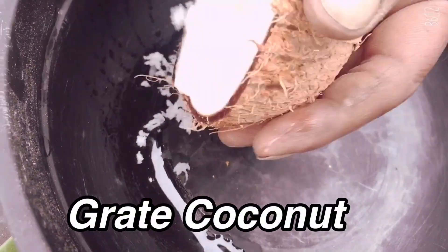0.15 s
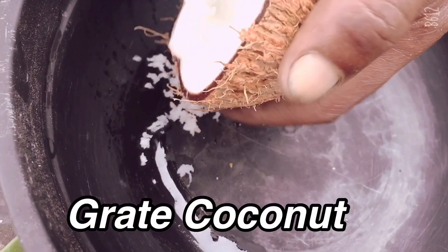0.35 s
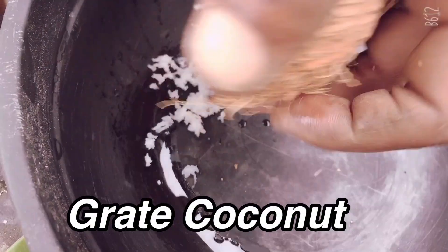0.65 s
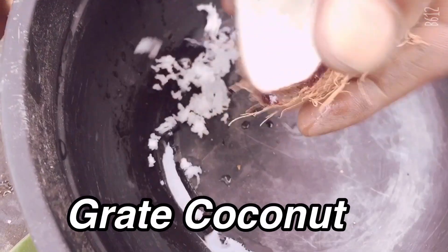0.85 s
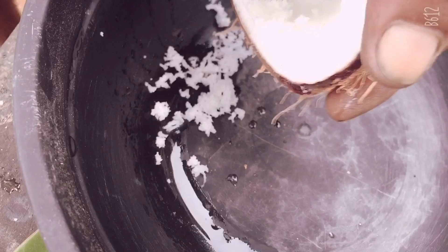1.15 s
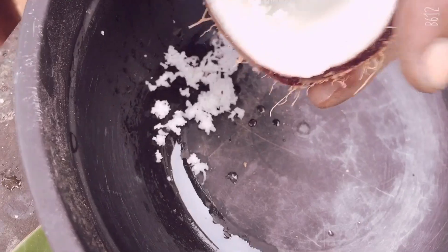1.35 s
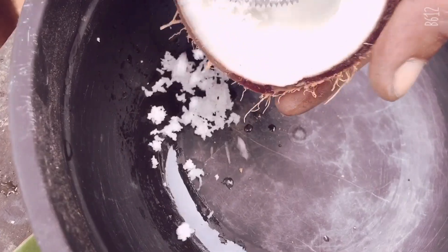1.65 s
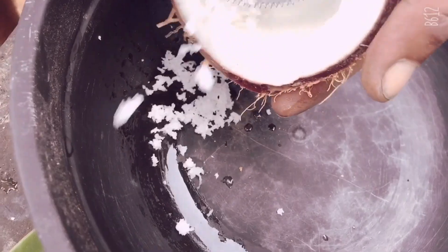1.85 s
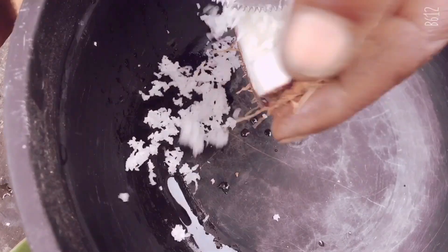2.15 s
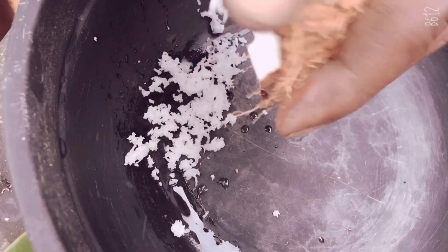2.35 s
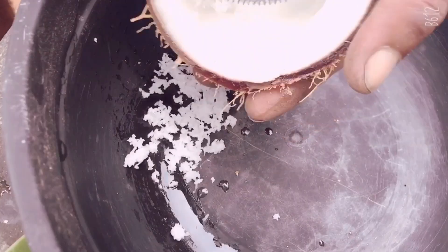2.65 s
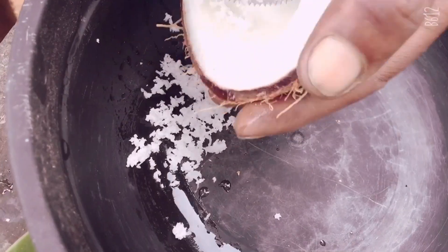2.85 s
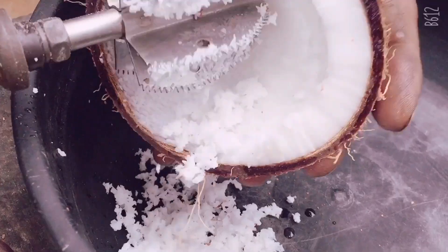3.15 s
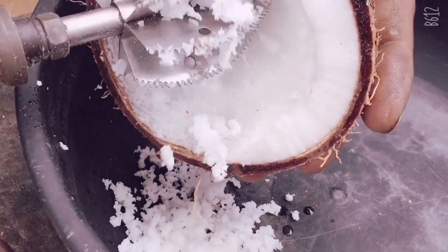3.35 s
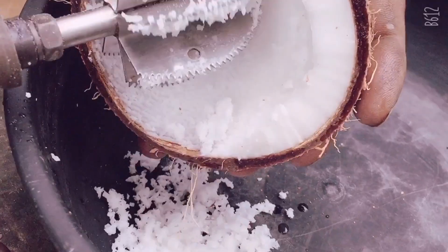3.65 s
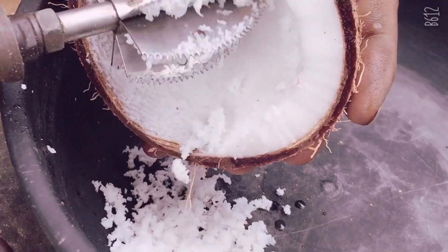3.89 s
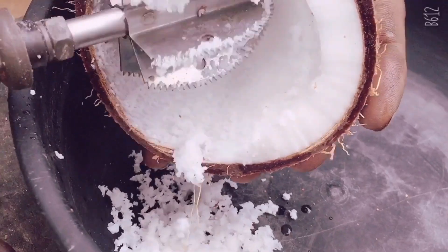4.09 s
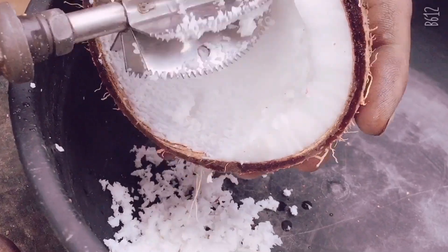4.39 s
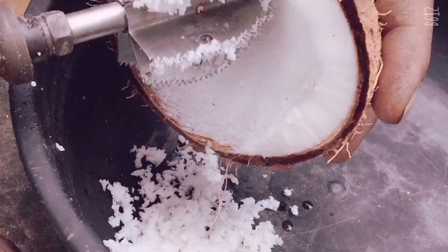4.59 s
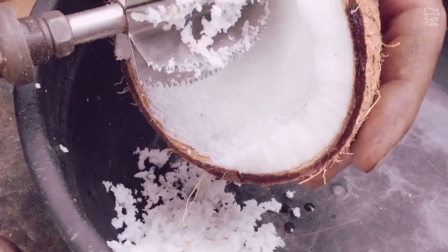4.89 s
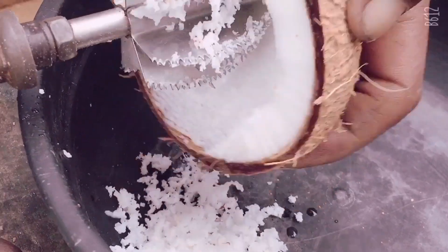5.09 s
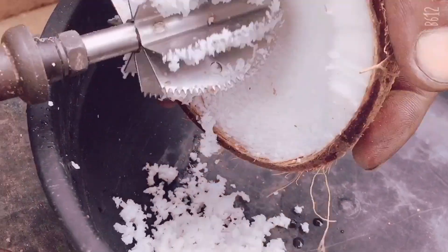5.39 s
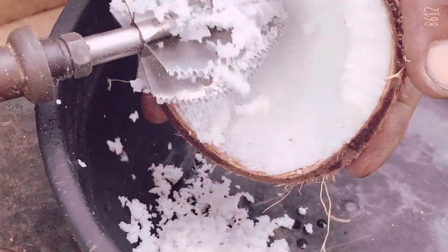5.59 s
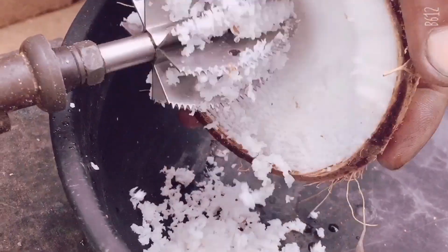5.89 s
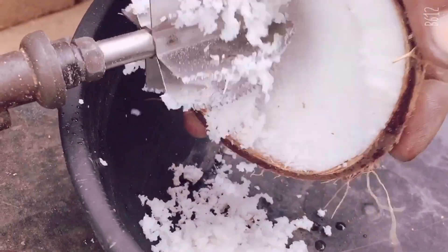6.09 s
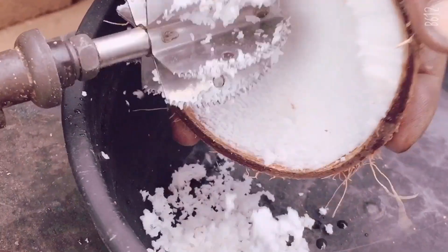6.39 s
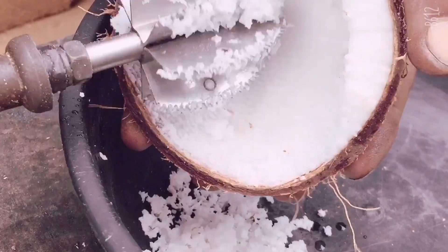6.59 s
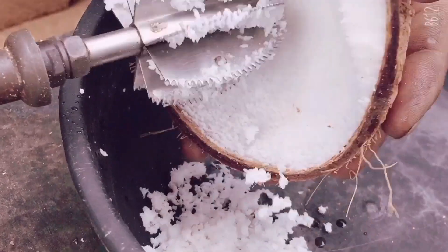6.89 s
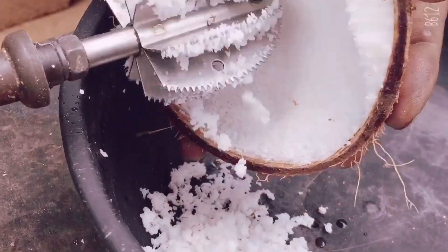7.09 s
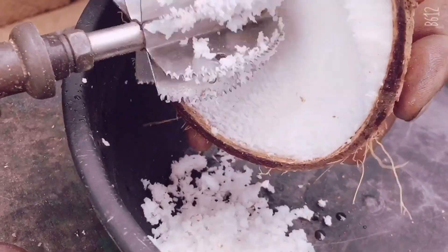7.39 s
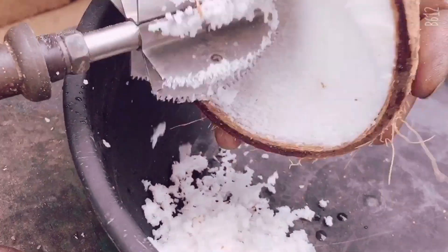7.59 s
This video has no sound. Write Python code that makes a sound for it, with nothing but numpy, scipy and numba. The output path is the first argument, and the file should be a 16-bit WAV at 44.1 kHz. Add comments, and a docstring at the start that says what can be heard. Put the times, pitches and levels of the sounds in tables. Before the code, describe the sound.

Coarse, dense rasping of coconut flesh on a toothed metal grater, with loose shaft knocks, a low stand rumble and two brief pauses.

```python
"""Half a coconut is pressed on a hand-cranked grater head of six toothed steel blades, over a stone bowl.
Dense random tooth ticks ring the shell and tear out hiss; quick jolts of level and slipping blades shape both.
Behind them the loose shaft knocks in bursts of ringing and crunch, the stand rumbles, and faint low pulses,
faint whistles and still yard air lie beneath. One dry mono microphone, no echo; the sound drops out once.
In the dropout and in the last pause the nut is held anew, which shifts the resonances of the shell."""
import sys
import numpy as np
from scipy import signal
from scipy.fft import rfft, irfft
from scipy.io import wavfile
from scipy.ndimage import uniform_filter1d
from numba import njit

SR = 44100
rng = np.random.default_rng(int(sys.argv[2]) if len(sys.argv) > 2 else 0)


def persist_wave(psi):
    """Save psi, clipped to +-1, as 16-bit WAV."""
    counts = np.round(np.clip(psi, -1, 1) * 32767).astype(np.int16)
    wavfile.write(sys.argv[1], SR, np.atleast_2d(counts).T)


N = 341334


def undb(db):
    """Amplitude factor of a level in dB."""
    return 10 ** (np.asarray(db) / 20)


def unit(x):
    """Scale to an rms of 1."""
    return x / np.sqrt(np.mean(x ** 2))


def filtered(sos, x):
    """Run x once through second-order sections."""
    return signal.sosfilt(sos, x)


@njit
def resonance(x, hz, width):
    """State-variable band-pass with a moving centre, gain 1 there."""
    y, band, low = np.empty(len(x)), 0., 0.
    for i in range(len(x)):
        g, damping = np.pi * hz[i] / SR, width[i] / hz[i]
        g += g ** 3 / 3  # approximates tan(g)
        v = (band + g * (x[i] - low)) / (1 + g * (g + damping))
        band, low, y[i] = 2 * v - band, low + 2 * g * v, damping * v
    return y


def coloured(x, points):
    """Shape the spectrum of x by (frequency [Hz], level [dB]) points joined on a log-frequency axis."""
    hz, db = np.transpose(points)
    f = np.arange(N // 2 + 1) * SR / N + 1
    gain = undb(np.interp(np.log(f), np.log(hz), db, left=-120, right=-120))
    return unit(irfft(rfft(x) * gain, N))


def walk(rate):
    """Random levels held 1 / rate s and smoothed twice; spread near 1."""
    k = int(SR / rate)
    steps = np.repeat(rng.standard_normal(N // k + 1), k)[:N]
    return 1.105 * uniform_filter1d(uniform_filter1d(steps, k), k)


def ticks(rate, spread_db):
    """Random tooth ticks of either sign, on average rate per second, a few stronger than the rest."""
    chance, size = rng.random(N), np.minimum(rng.exponential(1, N), 4)
    sign = np.where(chance < rate / SR / 2, 1, -1)
    return unit((chance < rate / SR) * sign * undb(spread_db * size))


def swells(rows, steep):
    """Brief rises or dips in dB from (time, height, length) rows; steep flattens their tops."""
    out, t = np.zeros(N + 8192), np.arange(-4096, 4096) / SR
    for s, db, length in rows:
        i = int(s * SR)
        out[i:i + 8192] += db * np.exp(-np.abs(t / (length / 2)) ** steep)
    return out[4096:N + 4096]


# moments when the nut is held anew: time [s]
REGRIPS = (3.08, 5.0)


def hold_number():
    """Which hold of the nut each sample falls in, counted from 0."""
    return np.searchsorted(REGRIPS, np.arange(N) / SR)


def body(holds, rate, spread_db, flicker_db, sway_db, snaps, own, wander, tilt_db=0):
    """Ticks ring each resonance, part shared and part its own; centres wander and jump with the hold."""
    hold = np.minimum(hold_number(), len(holds) - 1)
    shared, other, out = ticks(rate, spread_db), ticks(rate, spread_db), 0
    shared = shared + snaps * ticks(rate / 20, spread_db)  # tougher fibres snap now and then
    for modes in zip(*holds):  # the same resonance in every hold
        hz, width, db = (column[hold] for column in np.array(modes, float).T)
        level_db = db + tilt_db * np.log2(hz / 2800)
        level_db = level_db + flicker_db * walk(45) + sway_db * walk(6)
        own_ticks = own * np.roll(other, rng.integers(N))
        push = (shared + own_ticks) * undb(level_db)
        out = out + resonance(push, hz * (1 + wander * walk(13)), width)  # the nut rocks
    rms = np.sqrt([np.mean(out[hold == k] ** 2) for k in range(len(holds))])
    return out / rms[hold]


# cutting effort before and after the dropout:
# (time [s], hiss level [dB], rasp over hiss [dB], rumble level of the stand [dB])
CUTTING = [
    [(0.0, -38, 18, -29), (0.03, -36.5, 17, -28.5), (0.23, -46.5, 16.5, -38.5), (0.26, -69, 16, -56),
     (0.49, -55.5, 1, -60), (0.53, -55.5, 20.5, -37), (0.76, -38.5, 17.5, -32), (1.26, -36.5, 19, -35),
     (2.0, -39.5, 21.5, -32), (2.16, -38.5, 16, -34), (2.6, -37.5, 19, -31), (3.02, -44.5, 20, -40),
     (3.06, -47.5, 22.5, -42)],
    [(3.1, -38, 14.5, -33.5), (3.38, -39.5, 15.5, -30.5), (3.95, -39, 15.5, -32), (4.45, -39, 15, -33),
     (4.64, -36.5, 14.5, -33.5), (4.78, -41.5, 14.5, -29.5), (4.87, -68, 13, -55), (5.09, -79, 16, -56.5),
     (5.15, -47.5, 15.5, -34.5), (5.45, -37.5, 13, -32.5), (6.1, -39.5, 13.5, -27.5),
     (6.52, -37.5, 13, -30.5), (7.22, -35.5, 12, -30.5), (7.42, -39, 11.5, -34.5), (7.74, -34.5, 9.5, -25)],
]


def effort():
    """Pressing harder or easing off moves hiss, rasp and rumble, in dB, along straight lines."""
    s, *columns = np.transpose(np.concatenate(CUTTING))
    return [np.interp(np.arange(N) / SR, s, column) for column in columns]


# resonances of shell and blades under the teeth, first, second and third hold:
# (centre before wander [Hz], width [Hz], relative level [dB])
SHELL_MODES = ([(1110, 74, -24), (850, 110, -31), (1712, 53, -8), (2308, 140, 0), (2710, 110, -0.5),
               (2965, 150, 4), (3380, 140, 1.5), (3653, 117, 5), (4200, 200, -8.5)], [(1060, 74, -16),
               (1266, 13, -9.5), (1820, 210, -14.5), (2074, 44, -4), (2643, 194, 0.5), (3030, 220, -2),
               (3386, 124, -5.5), (3645, 88, -3), (4420, 94, -12.5)], [(1076, 70, -12), (1278, 30, -8),
               (1840, 150, -20), (2105, 110, -4.5), (2627, 184, -0.5), (2980, 210, -1.5), (3425, 113, -1.5),
               (3733, 115, 0.5), (4360, 180, -2.5)])
# brightness of the rasp about 2800 Hz: (time [s], tilt [dB per octave])
RASP_TILT = [(.3, 4), (0.56, -6), (0.66, 1), (.89, -2), (.96, 1), (2.45, -1), (2.8, 10.5), (3.1, -2)]


def rasp():
    """The main voice: teeth tick through the flesh and ring shell and blades."""
    tilt_db = np.interp(np.arange(N) / SR, *np.transpose(RASP_TILT))
    ringing = body(SHELL_MODES, rate=1100., spread_db=2.1, flicker_db=2.8, sway_db=.9,
                   snaps=.45, own=1.6, wander=0.024, tilt_db=tilt_db)
    # the thick flesh swallows the top
    return filtered(signal.cheby2(8, 30, 4950., fs=SR, output="sos"), ringing)


# spectrum of wet flesh tearing: (frequency [Hz], relative level per Hz [dB])
TEARING = [(2820, 6), (4800, -2.5), (5250, 1.5), (6330, 5), (7370, 1.5), (8140, 5), (9810, 4),
           (15600, -12.5)]
# steady level of the upper half of the hiss, one per hold: level [dB]
UPPER_HISS = (-1.5, -1, 0.5)


def hiss():
    """Fine tearing from very dense ticks, its lower and upper halves flickering apart."""
    tear = coloured(ticks(12000., 2.6), TEARING)
    lower = signal.sosfiltfilt(signal.butter(2, 9500., fs=SR, output="sos"), tear)
    upper_db = np.array(UPPER_HISS)[hold_number()] + 2.6 * walk(35)
    return lower * undb(1.4 * walk(35)) + (tear - lower) * undb(upper_db)


# quick level changes of the rasp, mostly sharp rises, a few dips:
# (time [s], change before shaping [dB], length [s])
QUICK_CHANGES = [(.1, 8, 0.018), (0.56, 12, 0.012), (0.707, 5.5, .015), (0.857, 5.5, .012), (0.87, 2, .012),
                 (.895, 4, 0.017), (0.944, 1.5, 0.016), (1.04, 4.5, 0.0079), (1.119, 7, .01),
                 (1.154, 3, 0.019), (1.203, -3, .015), (1.22, 3, .015), (1.247, 5, .015),
                 (1.4492, -4, 0.013), (1.642, 2, 0.011), (1.736, 6, 0.012), (1.785, 4, 0.016),
                 (1.8163, 3, 0.0051), (2.4609, -6, 0.0065), (2.573, 4.5, 0.03), (2.704, 7, 0.012),
                 (2.733, 4, .045), (2.812, 5, 0.035), (2.861, 4, .04), (3, 5, 0.018), (3.046, 5, .01),
                 (3.137, 4.5, 0.038), (3.276, 10, .012), (3.4, 2, 0.0087), (3.417, 1, 0.0084),
                 (3.484, 4, 0.007), (3.653, 5.5, 0.013), (3.7533, 5, 0.025), (3.865, 3, 0.016),
                 (4.199, 3.5, .02), (4.298, 2.5, .02), (4.3416, 5, .006), (4.448, 4.5, .025),
                 (4.567, 5.5, 0.03), (4.646, 4, .01), (4.68, 3.5, .03), (5.29, 4, 0.026), (5.505, 7, .015),
                 (5.445, 4, 0.025), (6.263, 5.5, .03), (6.626, 3, 0.011), (6.664, 4.5, .012),
                 (6.81, 3.5, 0.018), (7.54, 5, 0.046), (7.65, 3, 0.015), (7.731, 5, .015)]


def quick_changes():
    """Each change moves the level at once, then lets it return, in dB."""
    out, t = np.zeros(N + 4096), np.arange(4096) / SR
    for s, db, length in QUICK_CHANGES:
        i = int(s * SR)
        out[i:i + 4096] += db * (1 - np.exp(-t / 0.0016)) * np.exp(-(t / length) ** 2)
    return out[:N]


# a blade slips out of the flesh: (time [s], level change [dB], length [s])
BLADE_SLIPS = [(0.59, -8, 0.015), (0.697, -9, 0.033), (0.827, -7.5, 0.013), (0.937, -5, 0.019),
               (1.14, -2.5, 0.012), (1.414, -6.5, 0.031), (1.99, -7, 0.011), (2.053, -19, 0.015),
               (2.171, -6.5, 0.017), (2.234, -4, 0.019), (2.293, -8, 0.027), (2.532, -3, 0.034),
               (2.66, -2.5, 0.016), (2.695, -4, .01), (2.789, -4, 0.015), (2.91, -5.5, 0.019),
               (3.036, -4, 0.011), (3.129, -10, 0.028), (3.361, -9, 0.018), (3.493, -6.5, 0.046),
               (3.598, -11.5, 0.091), (3.7, -9.5, 0.039), (3.744, -6, 0.041), (4.272, -4.5, 0.044),
               (4.403, -3, 0.045), (5.182, -6.5, 0.063), (5.622, -8, 0.02), (5.668, -11.5, 0.018),
               (5.738, -7, 0.023), (5.807, -15.5, 0.031), (5.878, -2.5, 0.075), (6.164, -8, 0.035),
               (6.226, -14, 0.036), (6.297, -7.5, 0.039), (6.38, -6.5, 0.03), (6.498, -4, 0.017),
               (6.646, -7.5, 0.0092), (6.716, -6, 0.021), (6.776, -14, 0.031), (6.852, -4, 0.023),
               (6.916, -12.5, 0.039), (7.022, -6.5, 0.05), (7.074, -12, 0.015), (7.196, -5.5, 0.027),
               (7.258, -8, 0.019), (7.323, -13.5, 0.025), (7.456, -8, 0.024), (7.64, -4, 0.012)]


def grip():
    """Hold of the blades in dB: it chatters, changes quickly at times and falls away in each slip."""
    chatter = 0.45 * walk(25) + 1.74 * walk(80) + 1.4 * walk(200)
    return chatter + quick_changes() + swells(BLADE_SLIPS, 2.8)


# knocks of the shaft: (time [s], blow level before filtering [dB],
# low-mode boost [dB], high-mode boost [dB])
SHAFT_KNOCKS = [(.065, -6, -11, 0), (0.33, -34.5, -22, 17), (0.446, -30, -8, -8), (.512, -26, -4, 0),
                (0.522, -22.5, -4, 7), (.54, -12, -31, -12), (.577, -14.5, -17, -9), (.597, -18.5, -9, -17),
                (0.725, -10, -23, 3), (0.78, -10.5, -5.5, 2), (0.802, -15, -14, 1), (.873, -16, -1, -5),
                (.905, -21, -7, -5), (0.841, -4.5, -19, -8), (1.365, -7.5, -14, -1), (1.425, -10, -5, -15),
                (1.81, -8.5, -13, -8), (1.8297, -6, -27, 6), (2.073, -10.5, -18, -6),
                (2.122, -9.5, -17, -21), (2.32, -15.5, -15, -4), (2.626, -7.5, -8, 1),
                (2.68, -4.5, -11, 1.5), (2.741, -9, -6, 14), (3.222, -12.5, -10, -8),
                (3.2476, -4.5, -10.5, -2.5), (3.303, -18, -6, -14), (3.334, -12, -2, -15),
                (3.4813, -14.5, -26.5, 7), (3.966, -9.5, -25, 14.5), (4.039, -16, -2, -16),
                (4.913, -44, -10, 9), (4.988, -44, -8, -2), (5.1204, -21, -7, -21), (5.132, -10.5, -7, -15),
                (5.189, -24, 4, -18), (5.202, -7.5, -8, -24), (5.398, -6, -12, 0), (5.419, -7.5, -6, 5),
                (5.433, -7, -6, 0), (5.563, -15, -5, 3), (5.6475, 1, -14, -23), (5.7182, -11.5, -13, -19),
                (5.775, -13, -4, -1), (5.789, -14, -16, -14), (5.813, -19, -12, -9), (5.832, -10, -15, -3),
                (5.9301, -5.5, -5, -2.5), (6.073, -5, -10, -13), (6.114, -9, -3.5, 5),
                (6.139, -14.5, 6, -9), (6.208, -16.5, 2, -10), (6.358, -2, -11.5, -3),
                (6.485, -11.5, -4, -3), (6.525, -15, 0, 5), (6.63, -12, -22, -4), (6.653, -15, -15, 2),
                (6.751, -15, -28, 12), (6.88, -13.5, -4, -1), (6.89, -9.5, -17, -6), (6.923, -19, -7, -4),
                (6.971, -13.5, -2, 14), (7.089, -18, -2, 4), (7.175, 1, -9, 0), (7.241, -11, -12, -5),
                (7.2666, -13.5, -7, -9), (7.2961, -10, -14, -3), (7.31, -14, -6, -10),
                (7.331, -19, -6, -12), (7.3497, -19, -17, 0), (7.486, -14.5, -6, 2), (7.598, -12, -3, 9)]
# modes of the shaft: (frequency before detuning [Hz], relative level [dB], 60 dB decay before choking [s])
SHAFT_MODES = [(446, 2.5, 0.22), (715, -14, .025), (1073, 2, 0.095), (1263, 12, 0.06), (1615, -6, 0.16),
               (2017, 2.5, 0.059), (2132, 4, 0.054), (2600, 10, 0.025), (3010, 9, 0.02),
               (3350, 6.5, 0.0088), (3680, 7, 0.012), (4180, 2.5, 0.026)]
LOW_HZ, HIGH_HZ = 1500, 2800  # low modes lie under, high modes over
FIRST_HOLD_PITCH = 1.039  # pitch factor of the modes before the dropout
CRUNCH = 4.3  # gain of crushed fibre against the ring
CONTACT_S, LEAD_S = .0045, 0.0002  # span of the touches; how far a blow starts before its time


def knocks():
    """The loose shaft touches four times in each contact and rings its modes, each blow in its own mix."""
    out, t = np.zeros(N + 4096), np.arange(2048) / SR
    short_t = t[:1024]
    hz, db, t60 = np.transpose(SHAFT_MODES)[:, :, None]
    count = len(SHAFT_KNOCKS)
    crunch_band = signal.butter(3, [1050., 3600.], "band", fs=SR, output="sos")
    noises = filtered(crunch_band, rng.standard_normal((count, 1024)))
    mixes = rng.standard_normal((count, 3, len(SHAFT_MODES), 1))
    rattles = rng.random((count, 2, 4))
    for knock, noise, mix, rattle in zip(SHAFT_KNOCKS, noises, mixes, rattles):
        s, blow_db, low_db, high_db = knock
        phase, size, detune = mix
        lag, share = rattle
        pitch = (FIRST_HOLD_PITCH if s < DROPOUT[0] else 1) * (1 + 0.01 * detune)
        gain = undb(db + low_db * (hz < LOW_HZ) + high_db * (hz > HIGH_HZ) + 2.0 * size)
        decay = np.exp(-np.log(1000) * t / t60)
        ring = np.sum(gain * decay * np.sin(2 * np.pi * (hz * pitch * t + phase)), axis=0)
        # the flesh closes round the blades and chokes the ring
        ring *= (1 - np.exp(-t / .001)) * np.exp(-(t / .010) ** 2)
        crunch_shape = CRUNCH * np.minimum(short_t / 0.00071, 1) * np.exp(-short_t / 0.0062)
        hit = np.zeros(4096)
        for k in range(4):  # touches spread over the contact; all but the first scatter
            i = int((k + .6 * lag[k] * (k > 0)) / 4 * CONTACT_S * SR)
            hit[i:i + 2048] += (1 + 0.43 * share[k]) * ring
            hit[i:i + 1024] += crunch_shape * np.roll(noise, 256 * k)  # fibres crunch
        hit *= 0.52 / np.sqrt(np.max(uniform_filter1d(hit ** 2, size=128)))  # equal short-term peak
        i = int((s - LEAD_S) * SR)
        out[i:i + 4096] += undb(blow_db) * hit
    # the flesh dulls the blow
    out = filtered(signal.butter(6, 4700., fs=SR, output="sos"), out)
    # a small shaft radiates no bass
    return filtered(signal.butter(2, 250., "high", fs=SR, output="sos"), out[:N])


# resonances of stand and bowl, first and later holds:
# (centre before wander [Hz], width [Hz], relative level [dB])
STAND_MODES = ([(158, 14.3, 1), (185.5, 21, -2.5), (236, 23, -14.5), (414, 16, -11.5), (502.3, 36, -6),
               (680.5, 13.4, -11.5)], [(154.1, 8.9, 4.5), (186.6, 30.4, -1.5), (237, 19, -11.5),
               (411.2, 27.3, -3.5), (793, 34, -16.5), (653.5, 40, -10.5)])
# the stand takes a jolt and its rumble changes for a moment: (time [s], rise, negative for a dip [dB])
STAND_JOLTS = [(0.081, 5), (0.449, 19.5), (0.581, 7), (0.82, 5), (0.965, 2.5), (1.131, 5.5), (1.439, 6.5),
               (1.947, 5), (2.336, 6), (2.632, 9.5), (3.214, 8), (4.018, 6), (4.377, 4.5), (5.426, 7),
               (5.52, 5), (5.574, 6.5), (5.792, 5.5), (5.94, 3), (6.04, 4), (6.14, 6), (6.213, 11),
               (6.32, -5), (6.6, 5), (6.762, 8), (7.059, 3.5), (7.123, 6.5), (7.25, 7.5), (7.611, 8)]
JOLT_S = 0.028  # length of a jolt


def stand(rumble_db, grip_db):
    """Cutting ticks shake stand and bowl, which rumble in their own low modes."""
    rumble = body(STAND_MODES, rate=400., spread_db=1.6, flicker_db=2.4, sway_db=.7,
                  snaps=.15, own=1.66, wander=0.013)
    jolt_db = swells([(s, db, JOLT_S) for s, db in STAND_JOLTS], 4.5)
    rumble = rumble * undb(rumble_db + jolt_db + 0.29 * grip_db + 2.0 * walk(28))
    # the small stand cannot carry deep bass
    return filtered(signal.cheby2(6, 32, 100., "high", fs=SR, output="sos"), rumble)


# faint low bell-shaped pulses: (time [s], peak level [dB])
LOW_PULSES = [(3.096, -42), (5.53, -50), (7.172, -44), (7.6, -46)]
PULSE_S = 0.01  # width of a pulse, between its 1/e points


def pulses():
    """Faint low pulses, each a single bell-shaped swing to one side."""
    t = np.arange(N) / SR
    return sum(undb(db) * np.exp(-((t - s) / PULSE_S * 2) ** 2) for s, db in LOW_PULSES)


# faint whistles in the second pause, one table each: (time [s], pitch [Hz], level [dB])
SQUEAKS = [
    [(5.035, 3150, -83), (5.055, 3080, -57), (5.085, 2920, -54), (5.12, 2550, -54), (5.13, 2500, -80)],
    [(4.92, 4050, -80), (4.945, 4050, -58), (4.99, 3950, -66), (5.04, 4080, -63), (5.09, 4200, -75)],
    [(4.8, 2480, -55), (4.86, 2460, -60), (4.96, 2480, -72)],
]


def whistle():
    """Faint blurred squeaks: noise in a narrow gliding resonance."""
    t, out = np.arange(N) / SR, 0
    for s, hz, db in map(np.transpose, SQUEAKS):
        width_hz = np.full(N, 90.)
        tone = resonance(rng.standard_normal(N), np.interp(t, s, hz), width_hz)
        out = out + undb(np.interp(t, s, db, left=-140, right=-140)) * unit(tone)
    return out


# spectrum of the still yard air: (frequency [Hz], relative level per Hz [dB])
YARD_AIR = [(24, -57), (40, -10), (110, -4), (183, -5), (977, -14), (3080, -13), (4590, -18), (4950, -23),
            (5330, -24), (12500, -22), (13800, -26), (15600, -26)]
YARD_DB = -57.5  # rms level of the air


def air():
    """Still air of the yard: steady noise, weighted to the bass."""
    return undb(YARD_DB) * coloured(rng.standard_normal(N), YARD_AIR)


def scene():
    """Grater in front, then knocks, stand, pulses, whistles and yard air, in one channel."""
    hiss_db, rasp_db, rumble_db = effort()
    grip_db = grip()
    rasping = rasp() * undb(rasp_db + grip_db)
    tearing = hiss() * undb(uniform_filter1d(grip_db, size=256))
    grater = undb(hiss_db) * (rasping + tearing)
    return (grater + knocks() + stand(rumble_db, grip_db) + pulses() + whistle() + air())[None]


# the sound drops out: (start [s], end [s]), the middles of the fades
DROPOUT = (3.066, 3.0945)
TOP_HZ = 15757  # upper limit of the microphone sound


def record(dry):
    """At the microphone the sound fades and drops out once; peaks are rounded and the top is cut."""
    t = np.arange(N) / SR
    fade_out = np.clip((DROPOUT[0] - t) / 0.0044 + .5, 0, 1) ** 2
    fade_in = np.clip((t - DROPOUT[1]) / 0.0016 + .5, 0, 1)
    rounded = np.tanh(0.82 * dry * (fade_out + fade_in)) / 0.77
    return filtered(signal.ellip(10, .2, 80, TOP_HZ, fs=SR, output="sos"), rounded)


dry = scene()
out = record(dry)
persist_wave(out)
```